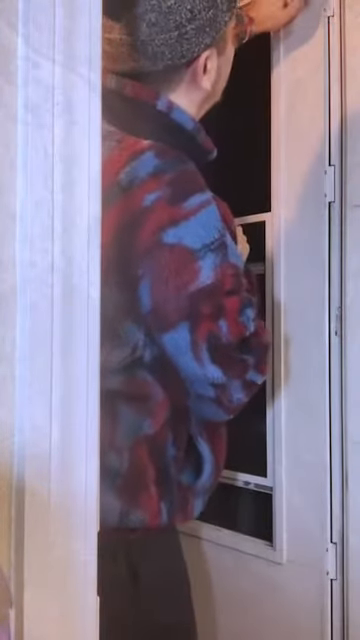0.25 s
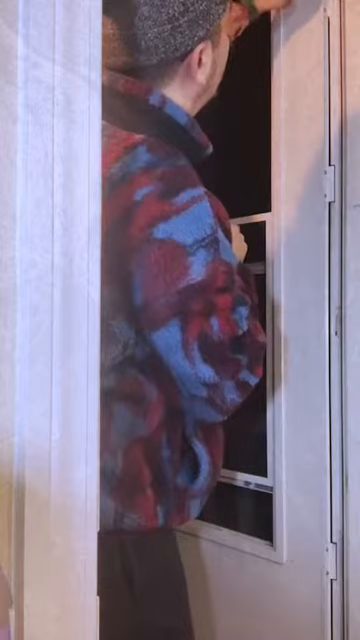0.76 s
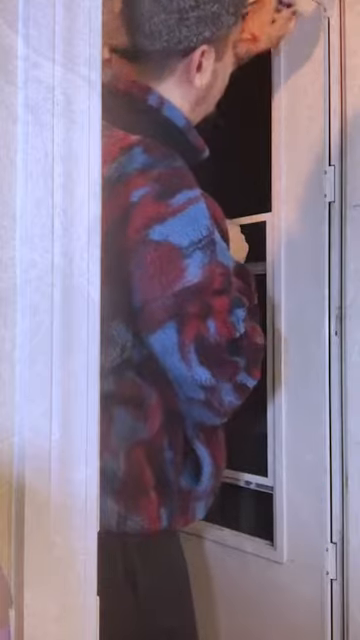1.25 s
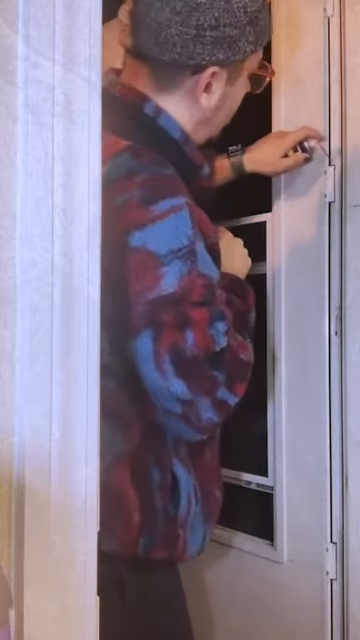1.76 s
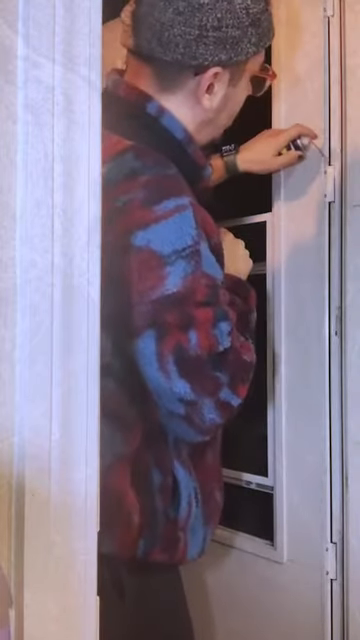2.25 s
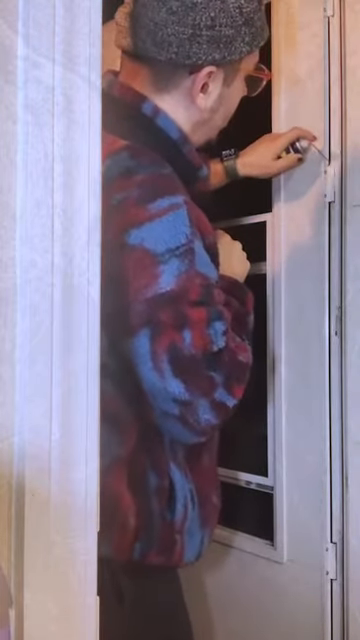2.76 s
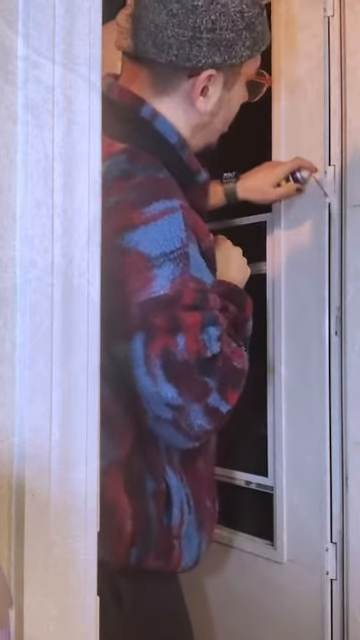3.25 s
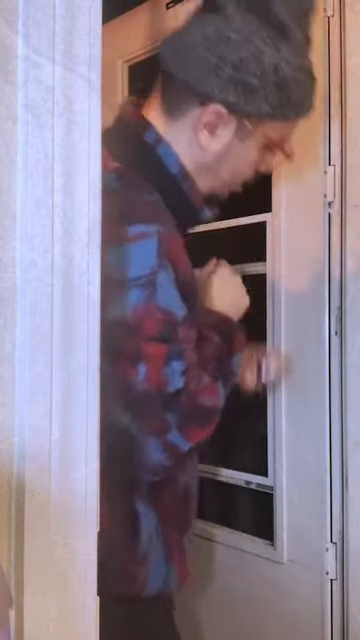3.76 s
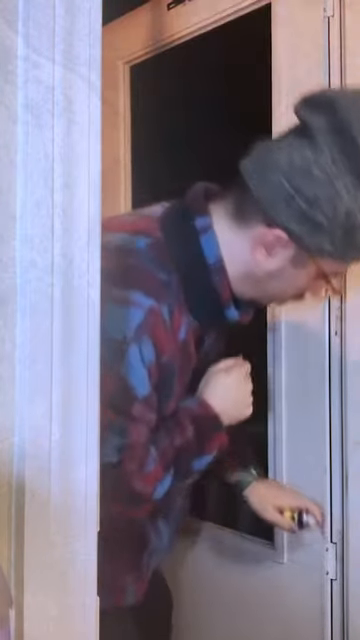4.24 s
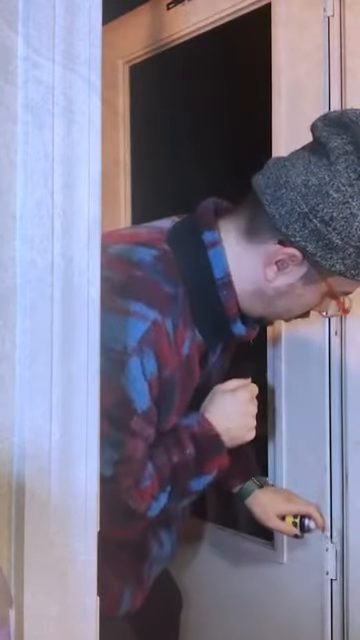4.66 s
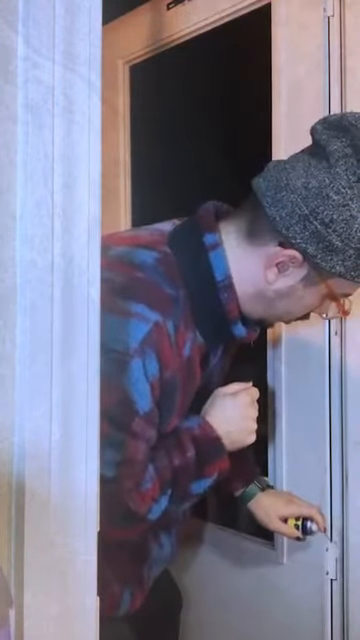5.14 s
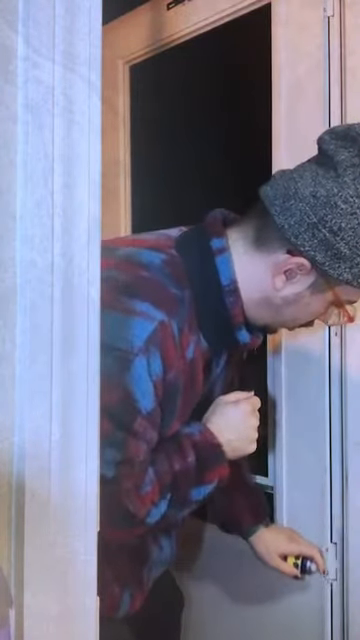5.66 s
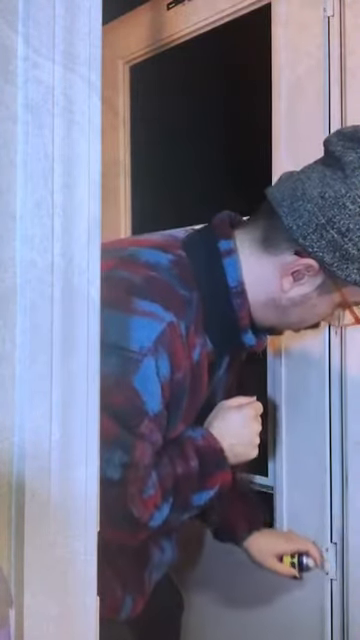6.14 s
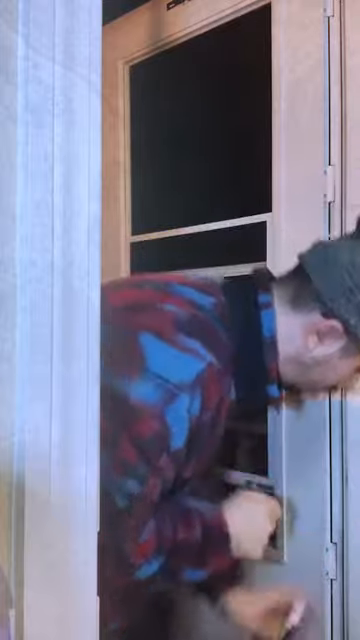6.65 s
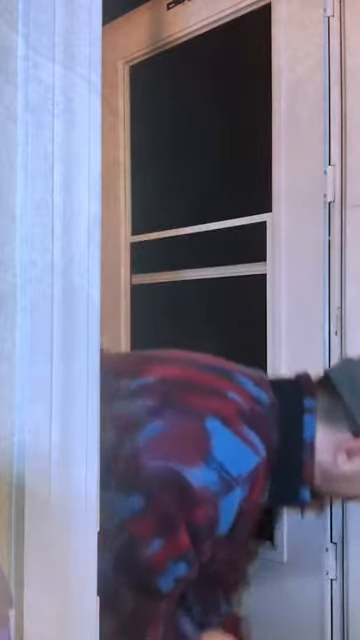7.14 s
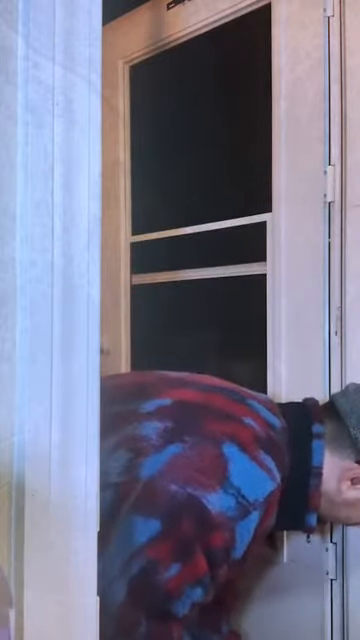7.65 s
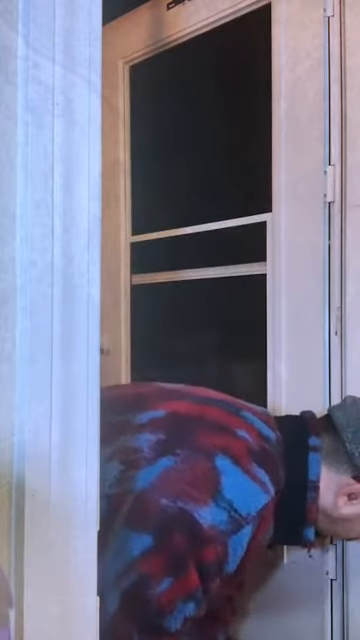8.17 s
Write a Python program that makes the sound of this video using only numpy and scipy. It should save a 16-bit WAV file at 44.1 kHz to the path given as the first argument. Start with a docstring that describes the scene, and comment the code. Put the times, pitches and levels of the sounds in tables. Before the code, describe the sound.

A spray can hisses already at the start, stops with dull finger taps, puffs briefly, then knocks the door several times quickly. After two light ticks comes a steadier, whistling hiss. Cloth swishes, a thud and one crisp click lead to a long spray that spits and crackles. Tiny ticks and faint rubs precede the final hiss. Close microphone, short hard reflections, quiet room tone with low mains hum.

```python
"""Oiling door hinges in a small entryway

Place: a hard entryway with door and jambs close by; an aerosol can with a thin straw sprays in five bursts.
Spray is shaped noise through moving resonances, with droplets and spits; raps, thuds, light ticks and one
click are ringing modes plus noise cracks; sleeve swishes and the soft tail of the early thuds are flickering
noise, and faint rubs are wavering tones.
Echoes and a ringing door surround them; room tone, mains hum, rumble and microphone wander lie beneath."""
import sys
import numpy as np
from scipy import signal
from scipy.fft import rfft, irfft
from scipy.io import wavfile

SR = 44100
rng = np.random.default_rng(int(sys.argv[2]) if len(sys.argv) > 2 else 0)


def dump_mix(stems):
    """Bounce the given channels to the path in sys.argv[1] as a 16-bit WAV at rate SR."""
    frames = np.atleast_2d(stems).T  # one column per channel
    limited = np.clip(frames, -1, 1)  # hard clip at full scale
    pcm = np.round(limited * 32767).astype(np.int16)
    wavfile.write(sys.argv[1], SR, pcm)


N = 370658


def from_db(db):
    """Level in dB to amplitude."""
    return 10 ** (np.asarray(db) / 20)


def rms_one(x):
    """Scale a signal to rms 1."""
    return x / np.sqrt(np.mean(x ** 2) + 1e-20)


def in_time(rows):
    """Each column of a timed table, joined by straight lines."""
    s, *columns = np.transpose(rows)
    return [np.interp(np.arange(N) / SR, s, c) for c in columns]


def held(events, column):
    """Each event's value, held until the next event starts."""
    events = np.array(events)
    latest = np.searchsorted(events[:, 0], np.arange(N) / SR) - 1
    return events[np.clip(latest, 0, None), column]


def sounding(since, until, edge_s):
    """1 while an event lasts, 0 outside, with short ramps."""
    return np.clip(np.minimum(since, until) / edge_s, 0, 1)


def at_hz(points, hz, column=1):
    """Read a frequency table along a logarithmic frequency axis."""
    points = np.array(points)
    return np.interp(np.log(hz), np.log(points[:, 0]), points[:, column])


def drift(rate):
    """Slow chance: noise at every 40th sample through a double one-pole low-pass; spread 1."""
    r = np.exp(-80 * np.pi * rate / SR)
    noise = rng.standard_normal(N // 40 + 2002)
    slow = signal.lfilter([1], [1, -2 * r, r * r], noise)[2000:]   # the filter has settled
    return np.interp(np.arange(N) / 40, np.arange(len(slow)), rms_one(slow))


def bands(count, low_hz, per_octave=3):
    """Narrow bands of white noise, neighbours unrelated: (centre Hz, noise)."""
    white = rng.standard_normal((2, count))
    edges = np.geomspace(low_hz, 17000, int(per_octave * np.log2(17000 / low_hz)))
    for k, (low, high) in enumerate(zip(edges, edges[1:])):
        band = signal.butter(2, [low, high], "band", fs=SR, output="sos")
        yield np.sqrt(low * high), signal.sosfilt(band, white[k % 2])


def coloured(spectrum, patchy_db, shifting_db=0, per_octave=3):
    """Noise of a given spectrum whose bands flicker, partly together, and may shift slowly; rms 1."""
    together, out = drift(18.0), 0
    for hz, noise in bands(N, spectrum[0][0], per_octave):
        flicker_db = patchy_db * (1.3 * together + drift(3.9))
        if shifting_db:
            flicker_db = flicker_db + shifting_db * drift(0.74)
        out = out + from_db(at_hz(spectrum, hz)) * from_db(flicker_db) * noise
    return rms_one(out)


def tube(x, centre_hz, width_hz):
    """A resonance whose centre and width move, stepped in short blocks."""
    out, state = np.zeros(N), np.zeros(2)
    r = np.exp(-np.pi * width_hz * np.ones(N) / SR)
    for i in range(0, N, 512):
        a = [1, -2 * r[i] * np.cos(2 * np.pi * centre_hz[i] / SR), r[i] ** 2]
        b = np.array([1, 0, -1]) * (1 - r[i] ** 2) ** .75
        out[i:i + 512], state = signal.lfilter(b, a, x[i:i + 512], zi=state)
    return out


def whistle(centre_hz, width_hz):
    """Noise twice through a moving resonance; rms 1."""
    once = tube(rng.standard_normal(N), centre_hz, width_hz)
    return rms_one(tube(once, centre_hz, width_hz))


def ring(clicks, hz, t60):
    """A unit click sets a sine of about height 1 ringing, 60 dB down after t60."""
    r, w = from_db(-60 / (t60 * SR)), 2 * np.pi * hz / SR
    return signal.lfilter([0, np.sin(w)], [1, -2 * r * np.cos(w), r * r], clicks + 1e-18)


def strikes(events, column_db):
    """A click at each event."""
    clicks = np.zeros(N)
    clicks[np.round(np.array(events)[:, 0] * SR).astype(int)] = from_db(column_db)
    return clicks


def knocks(events, peak_db, modes):
    """Each blow knocks the modes of a body with strengths of its own."""
    uneven_db = rng.normal(0, 1.5, (len(events), len(modes)))
    return sum(ring(strikes(events, peak_db + level_db + uneven_db[:, k]), hz, t60)
               for k, (hz, level_db, t60) in enumerate(modes))


def even_crack(t60, contact_s):
    """A burst of noise that builds over the contact, dies away and holds every pitch about equally."""
    t = np.arange(int(t60 * SR)) / SR
    fade = np.clip(t / contact_s, .05, 1) * from_db(-60 * t / t60)
    burst = rng.standard_normal(4096)[:len(fade)] * fade
    for _ in range(2):   # flatten the spectrum, then restore some of the fade
        spectrum = rfft(burst)
        burst = irfft(spectrum / (np.abs(spectrum) + 1e-12), len(fade)) * fade ** .3
    return rms_one(burst) * np.sqrt(np.mean(fade ** 2))


def blows(events, modes, crack_s, crack_hz, trim_db, ring_wet_db, crack_wet_db,
          contact_s=.001, behind=None, from_hz=30):
    """Short modes, a broad crack and a share passed to the body behind: (direct, into the room)."""
    events = np.array(events)
    peak_db, sharp_db = events[:, 1] + trim_db, events[:, 2]
    contacts = strikes(events, peak_db + sharp_db - 1.5)
    crack = signal.oaconvolve(contacts, even_crack(crack_s, contact_s))[:N]
    crack = signal.sosfilt(signal.butter(3, crack_hz, "band", fs=SR, output="sos"), crack + 1e-18)
    low_cut = signal.butter(4, from_hz, "high", fs=SR, output="sos")
    rings, crack = signal.sosfilt(low_cut, [knocks(events, peak_db, modes), crack])
    body = knocks(events, peak_db + events[:, 3], behind) if behind else 0
    direct = rings + crack + body
    # ring and crack spread into the room in different shares
    spread = from_db(ring_wet_db) * rings + from_db(crack_wet_db) * crack + body
    return np.array([direct, spread])


# spectrum of the room tone: f/Hz, relative level per Hz/dB
AIR = [(60, -5), (85, 6), (110, -30), (150, -6.5), (250, -3.5), (600, -6), (1500, -13), (3000, -19),
       (8000, -19.5), (15600, -28)]


def background():
    """Room tone, a mains line that wavers a little, deep rumble and a microphone wander too slow to hear."""
    mains_hz, waver_rad = 60, .15
    phase = 2 * np.pi * (mains_hz * np.arange(N) / SR + rng.random()) + waver_rad * drift(3.1)
    hum = np.sqrt(2) * np.sin(phase)
    rumble_band = signal.butter(2, [12, 40], "band", fs=SR, output="sos")
    rumble = rms_one(signal.sosfilt(rumble_band, rng.standard_normal(N)))
    air = coloured(AIR, patchy_db=.4)
    return from_db(-73) * air + from_db(-54) * hum + from_db(-71) * rumble + from_db(-58) * drift(0.77)


def splatter():
    """Droplets burst on the metal at random, each ringing 25.6 cycles to -60 dB; rms 1."""
    drops_per_s, cycles = 1500, 25.6   # the rate drifts around this
    sizes = from_db(0.41 * np.minimum(rng.exponential(1, N), 5)) * rng.choice([-1, 1], N)
    born = rng.random(N) < drops_per_s * from_db(3 * drift(15)) / SR
    pitches, dealt = np.geomspace(640, 2400, 14), rng.integers(0, 14, N)
    return rms_one(sum(ring(sizes * born * (dealt == k), hz, cycles / hz) * hz ** 1.46
                       for k, hz in enumerate(pitches)))


# valve presses: open t/s, shut t/s, first step level/dB, straw resonance f/Hz, its width f/Hz,
# hinge song over hiss level/dB
BURSTS = [(-0.2, 0.6, 0, 6300, 2030, -37), (1.038, 1.285, -7, 6600, 2000, -32),
          (2.03, 3.575, -12, 5890, 1320, -30), (4.523, 6.334, -7, 6170, 1920, -24.5),
          (7.509, 8.6, -14, 6700, 1300, -19)]
# flow of the jet, one table a burst: t/s, hiss level/dB, straw ring over hiss level/dB, mist over hiss level/dB
FLOW = [
    [(0.03, -51.5, -3.5, -15), (0.176, -55, -1, -5), (0.226, -50, -13, -17), (0.248, -54.5, -2.5, -11),
     (0.54, -53.5, 2, -1.5)],
    [(1.14, -51.5, -8, -8), (1.178, -56.5, 0.5, -5), (1.27, -53, -0.5, -5)],
    [(2.14, -54, -3.5, -7.5), (2.262, -53, 1.5, 0), (2.314, -53, -6, -10), (2.328, -55.5, 1, -1),
     (2.43, -58, 3.5, -1), (2.902, -55.5, 2.5, -1.5), (3.014, -55, -2, -5.5), (3.1, -55.5, 2.5, 0.5),
     (3.188, -53.5, 6, -1.5), (3.53, -59.5, 2.5, -0.5)],
    [(4.59, -53, -1.5, -12), (4.666, -56.5, -8, -6.5), (4.918, -54.5, 0, -9), (5.522, -53.5, -0.5, -6),
     (5.542, -46.5, -15, -10), (5.59, -48, -2.5, -8), (5.722, -48.5, -11, -7), (5.814, -47, -1.5, -14),
     (5.898, -53.5, -0.5, -4), (6.046, -48.5, -1, -5.5), (6.098, -50.5, -21, 1), (6.24, -49, -10.5, -6.5),
     (6.31, -48, -6, -5)],
    [(7.58, -43.5, -3.5, -9), (7.704, -52.5, -4, -4.5), (7.842, -48, -18, -5), (7.906, -48.5, -5.5, -16),
     (8.1, -51, -1.5, -6.5), (8.214, -49.5, -8, -14), (8.348, -52, -4, -8.5), (8.4, -52, -7, -16)],
]
# spectrum of the turbulent jet: f/Hz, relative level per Hz/dB
JET = [(820, 6), (1400, 1), (1750, -12), (2780, -4), (5190, -9.5), (5790, -11.5), (8240, -14.5),
       (12800, -24), (15600, -37)]
# colour of the jet in the hinge gap, one table a burst: t/s, centre f/Hz
GAP = [
    [(0.0, 3600), (0.088, 3360), (0.28, 2970), (0.396, 3580), (0.44, 3330), (0.488, 3650), (0.58, 3330)],
    [(1.06, 2700), (1.162, 3480), (1.256, 3340), (1.28, 3460)],
    [(2.1, 3600), (2.252, 3850), (2.314, 2850), (2.362, 3420), (3.464, 3730), (3.504, 3280), (3.55, 3560)],
    [(4.55, 3150), (4.842, 3780), (5.144, 3100), (5.368, 3520), (5.422, 3150), (6.206, 3170), (6.33, 3600)],
    [(7.52, 3370), (7.67, 3940), (7.796, 2940), (7.934, 3500), (8.144, 3430), (8.31, 3770), (8.4, 3580)],
]
# song of the wetted hinge: f/Hz, width f/Hz, relative level/dB
HINGE = [(1174, 155, -5.5), (1530, 290, -6)]
# droplets on the metal: t/s, splatter over hiss level/dB
SPLATTER = [(0, -15.5), (3.0, -15), (5.45, -16.5), (5.56, -16.5), (6.2, -15.5), (6.33, -11), (7.5, -17),
            (8.4, -21)]


def spray():
    """Turbulent hiss with its own mist level, air ringing in the straw and the hinge gap, droplets."""
    t = np.arange(N) / SR
    opened, shut, step_db, straw_hz, straw_width_hz, hinge_db = (held(BURSTS, column=k) for k in range(6))
    since, until = t - opened, shut - t
    # the jet builds for 0.1 s after its first step; it sags before it stops
    valve_db = step_db * np.clip(1 - since / 0.1, 0, 1) - 4 * np.clip(1 - until / 0.056, 0, 1)
    hiss_db, straw_db, mist_db = in_time(np.vstack(FLOW))

    jet = coloured(JET, patchy_db=1.2, shifting_db=1.5, per_octave=5)
    mist_from_hz = 8350
    body = signal.sosfilt(signal.butter(4, mist_from_hz, fs=SR, output="sos"), jet)
    mist = signal.sosfilt(signal.butter(4, mist_from_hz, "high", fs=SR, output="sos"), jet)
    gap = from_db(-3) * whistle(in_time(np.vstack(GAP))[0], width_hz=2730)
    low_cut = signal.cheby1(6, 1, 2050, "high", fs=SR, output="sos")   # the jet is too thin to radiate lows
    body = signal.sosfilt(low_cut, body + gap)

    straw = from_db(straw_db + 1.4 * drift(62)) * whistle(straw_hz + 80 * drift(2.7), straw_width_hz)
    hinge = sum(from_db(hinge_db + db) * whistle(np.full(N, hz), wide_hz) for hz, wide_hz, db in HINGE)
    droplets = from_db(in_time(SPLATTER)[0]) * splatter()
    mix = hinge + body + from_db(mist_db) * rms_one(mist) + straw + droplets
    return sounding(since, until, edge_s=0.00099) * from_db(hiss_db + valve_db) * mix


# decay of the entryway: f/Hz, t60 t/s, relative level/dB
ROOM = [(97.5, 0.49, -1.5), (490, 0.15, 6), (1390, 0.21, 3.5), (2700, 0.2, -0.5), (4420, 0.29, -6),
        (13000, 0.2, -7.5)]


def echoes():
    """Quick echoes from door and jambs close by and a tail that dies band by band, for one position."""
    first_echo_s = 0.0011
    t = np.arange(SR // 2) / SR
    tail = sum(noise * from_db(at_hz(ROOM, hz, column=2) - 60 * t / at_hz(ROOM, hz))
               for hz, noise in bands(count=len(t), low_hz=77.9))
    near = even_crack(0.072, first_echo_s)
    near = signal.lfilter([1], [1, -.4], np.pad(near, (0, len(t) - len(near))))
    start = np.clip(t / first_echo_s - 1, 0, 1)
    return sum(from_db(db) * part * start / np.sqrt(np.sum((part * start) ** 2))
               for db, part in [(-4.5, tail), (-3.5, near)])


# modes of the door leaf: f/Hz, relative level/dB, t60 t/s
DOOR = [(776, -7, 0.087), (1165, -4, 0.21), (1405, -11, 0.056), (1750, -7, 0.25), (1984, -9, 0.12),
        (2600, -16, 0.05)]


def entryway(x):
    """Echoes crossfade in a steady cycle of hand positions, and the door leaf rings along."""
    places, move_s = 3, .18
    place = np.arange(N) / (move_s * SR)
    shares = [np.clip(1 - np.abs((place - k) % places - 1), 0, 1) for k in range(places)]
    room = sum(signal.oaconvolve(x * np.sqrt(share), echoes())[:N] for share in shares)
    door = sum(from_db(level_db - 41.5) * ring(x, hz, t60) for hz, level_db, t60 in DOOR)
    return room + door


# fingers on the panel: t/s, peak level before trim/dB, sharpness level/dB
THUDS = [(0.569, -42, 12), (0.65, -49.5, -11), (0.697, -57, -13), (1.111, -40.5, 6), (1.23, -41.5, -10),
         (4.165, -44, 7)]
# modes of the panel: f/Hz, relative level/dB, t60 t/s
PANEL = [(109, 2.5, 0.052), (233, -4, 0.073), (306, -11.5, 0.12), (530, 4.5, 0.032), (1093, -11.5, 0.059)]


def finger_thuds():
    """Fingers set the low modes of the panel ringing, with a soft broad crack."""
    return blows(THUDS, PANEL, crack_s=0.024, crack_hz=[300, 4000], trim_db=-3.5,
                 ring_wet_db=-4, crack_wet_db=-1.5)


# first row the soft noisy tail under the early thuds, the others sleeve swishes:
# start t/s, length t/s, level at the fullest of the swell/dB, treble over dull part level/dB
SOFT_NOISES = [(0.58, 0.21, -72, -1), (1.72, 0.49, -77.5, -6), (3.96, 0.28, -70, -3), (4.17, 0.48, -74, -4),
               (6.55, 0.46, -76.5, -2), (6.805, 0.1, -82, 18.5), (6.95, 0.43, -73.5, -3)]
# spectrum of these soft noises: f/Hz, relative level per Hz/dB
FLEECE = [(240, -54), (400, -8), (687, -7), (900, -10), (967, -1), (1420, -3.5), (1910, -6), (6510, -8.5),
          (12000, -20.5), (15600, -72), (22000, -120)]


def thud_tail_and_sleeve():
    """Flickering noise swells and fades: first the tail under the early thuds, then a fleece sleeve sliding."""
    start, length, peak_db, crisp_db = (held(SOFT_NOISES, column=k) for k in range(4))
    since = np.arange(N) / SR - start
    swell_db = 9.5 * (np.interp(since / length, [0, 0.27, 1], [0, 1, 0]) - 1)   # rises for 27% of the length
    noise = coloured(FLEECE, patchy_db=1.2, per_octave=2)
    dull = signal.sosfilt(signal.butter(4, 2500, fs=SR, output="sos"), noise)
    crisp = signal.sosfilt(signal.butter(4, 2500, "high", fs=SR, output="sos"), noise)
    swelling = from_db(peak_db + swell_db) * (dull + from_db(crisp_db) * crisp)
    return sounding(since, length - since, edge_s=0.0051) * swelling


# can against the door: t/s, peak level before trim/dB, sharpness level/dB, weight on the frame level/dB
RAPS = [(1.287, -25, 5, -12.5), (1.367, -25.5, 5, -14), (1.421, -27.5, 3.5, -10.5), (1.468, -29, 3, -8.5),
        (1.523, -28, 3.5, -11.5)]
# modes of the can: f/Hz, relative level/dB, t60 t/s
CAN = [(790, -12, 0.083), (1325, 4, 0.015), (2460, 5, 0.014), (5800, -4, 0.0072)]
# modes of the door frame: f/Hz, relative level/dB, t60 t/s
FRAME = [(110, -6.5, 0.03), (246, -24.5, 0.055), (337, -8.5, 0.06), (455, 0.5, 0.023), (824, -1, 0.049),
         (1017, -11, 0.12)]


def can_raps():
    """The can strikes the door: its modes ring and the frame behind takes a share."""
    return blows(RAPS, CAN, crack_s=0.019, crack_hz=[500, 6500], trim_db=-6.5,
                 ring_wet_db=-6.5, crack_wet_db=7.5, behind=FRAME)


# light ticks: straw and nozzle, and at 4.1635 s a fingernail with the thud:
# t/s, peak level before trim/dB, sharpness level/dB, weight on the can's modes level/dB
TICKS = [(1.8302, -50, 9, 4), (1.9763, -29.5, 7, -3), (4.1635, -51, 14.5, -16), (6.4622, -66, 20, -27),
         (6.5954, -60, 4, -24), (6.6418, -52, 5, -31), (6.7356, -34, 12, -27), (6.82, -53, 7, -25),
         (6.847, -56, 10, -14), (6.9098, -36.5, 13, -32), (7.006, -41.5, 11, -21)]
# high modes of the ticks: f/Hz, relative level/dB, t60 t/s
TICK_MODES = [(3130, 5.5, 0.0076), (3360, -1.5, 0.01), (6700, 10, 0.0048), (7960, -1.5, 0.0069)]


def light_ticks():
    """Straw, nozzle and one fingernail: short high rings, a very brief crack and a share in the can's modes."""
    return blows(TICKS, TICK_MODES, crack_s=0.003, crack_hz=[2900, 9000], trim_db=-19.5,
                 ring_wet_db=2.5, crack_wet_db=10.5, contact_s=0.00013, behind=CAN, from_hz=3100)


# one click in two quick contacts: t/s, peak level before trim/dB, sharpness level/dB, weight on the frame level/dB
CLICK = [(4.328, -18, -2, -10), (4.3297, -22, -1, -10)]
# modes of the hardware: f/Hz, relative level/dB, t60 t/s
LATCH = [(1320, -2, 0.017), (2050, -7, 0.0058), (2600, 9, 0.018), (3150, 4, 0.013), (4830, -1, 0.0059)]


def hardware_click():
    """Two quick contacts ring small metal modes and the door frame as one sharp click."""
    return blows(CLICK, LATCH, crack_s=0.019, crack_hz=[600, 8000], trim_db=-11.0,
                 ring_wet_db=-6.5, crack_wet_db=11, behind=FRAME)


# slugs of oil from the straw: t/s, peak level/dB
SPITS = [(5.5444, -28), (5.5802, -37), (5.6494, -34), (5.8057, -30.5), (5.8314, -37), (6.2894, -35)]
# band of their pop: lower and upper f/Hz
SPIT_HZ = [2200, 7400]


def spits():
    """The straw spits slugs of oil, each a single broad pop."""
    band = signal.butter(2, SPIT_HZ, "band", fs=SR, output="sos")
    top = np.max(np.abs(signal.sosfilt(band, signal.unit_impulse(64))))
    return signal.sosfilt(band, strikes(SPITS, np.array(SPITS)[:, 1]) + 1e-18) / top


# faint pitched rubs as the hand moves: start t/s, length t/s, typical rms level/dB, pitch f/Hz
RUBS = [(6.597, 0.11, -80, 563), (6.634, 0.085, -80, 1445), (7.044, 0.059, -83, 1480),
        (7.086, 0.16, -80, 1405)]


def rubs():
    """A thin tone for each rub; it wavers in pitch and catches unevenly."""
    t = np.arange(N) / SR
    waver = np.cumsum(30.2 * drift(60)) / SR   # 30.2 Hz spread, in cycles
    catch_db = 2 * drift(25)
    out = np.zeros(N)
    for start, length, level_db, hz in RUBS:
        tone = np.sqrt(2) * np.sin(2 * np.pi * (hz * t + waver))
        out += sounding(t - start, start + length - t, edge_s=0.02) * from_db(level_db + catch_db) * tone
    return out


def scene():
    """Every source direct to the microphone, its share sent into the entryway, and the background."""
    jet = spray() + spits()
    soft = thud_tail_and_sleeve() + rubs()
    direct, spread = finger_thuds() + can_raps() + light_ticks() + hardware_click()
    # the jet is directional: only a share of it fills the room
    room = entryway(0.71 * jet + soft + spread)
    return (jet + soft + direct + room + background())[None]


def record(dry):
    """The microphone steps down in the upper treble; the top is cut steeply."""
    shelf = signal.ellip(6, .1, 30, 8650, fs=SR, output="sos")
    lows = signal.sosfiltfilt(shelf, dry)
    stepped = lows + from_db(-3) * (dry - lows)
    return signal.sosfilt(signal.ellip(10, .3, 60, 15700, fs=SR, output="sos"), stepped)


dry = scene()
out = record(dry)
dump_mix(out)
```